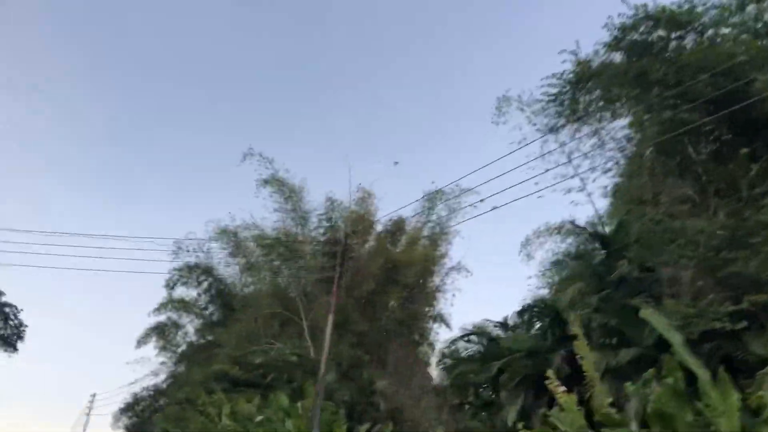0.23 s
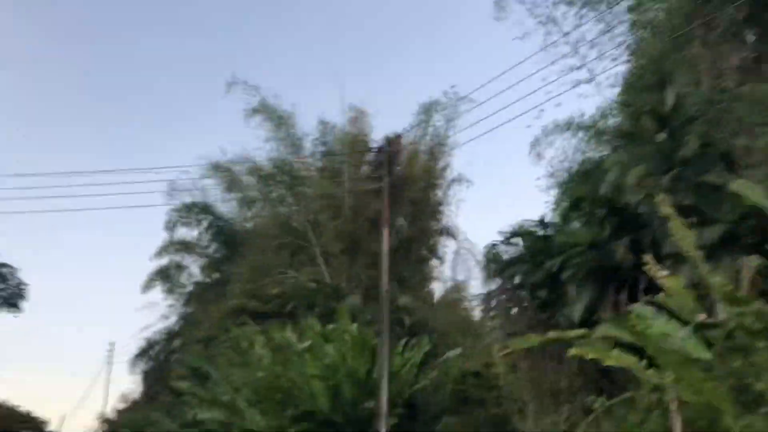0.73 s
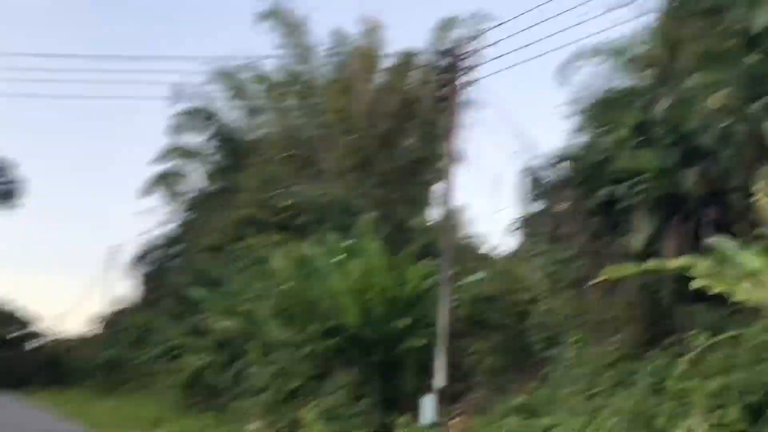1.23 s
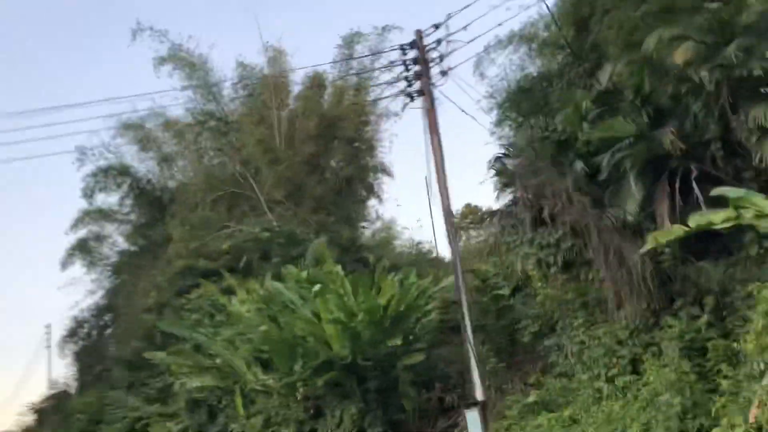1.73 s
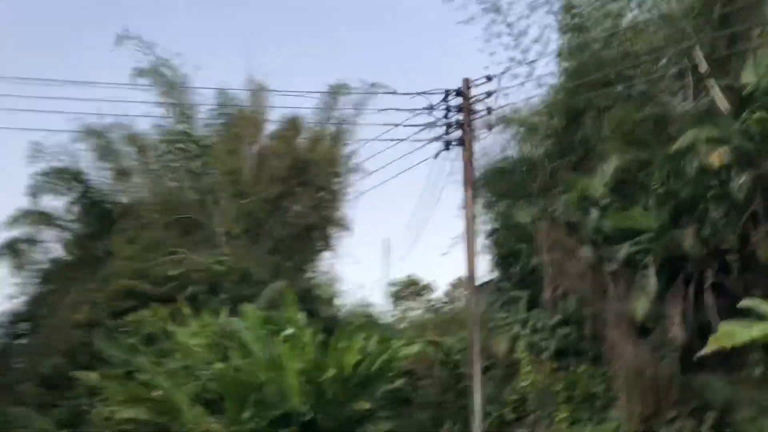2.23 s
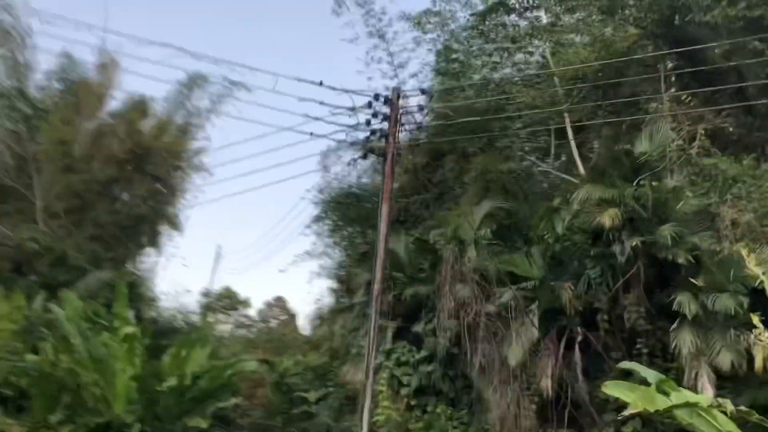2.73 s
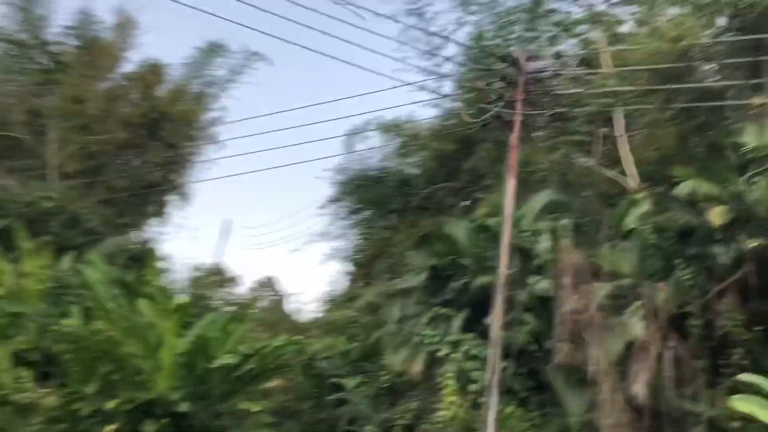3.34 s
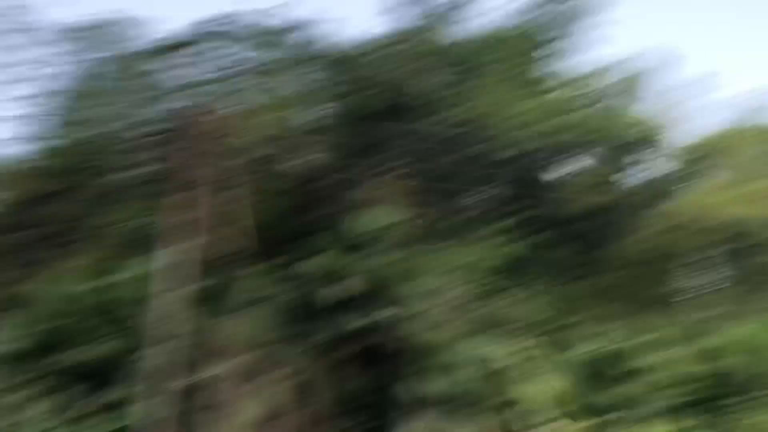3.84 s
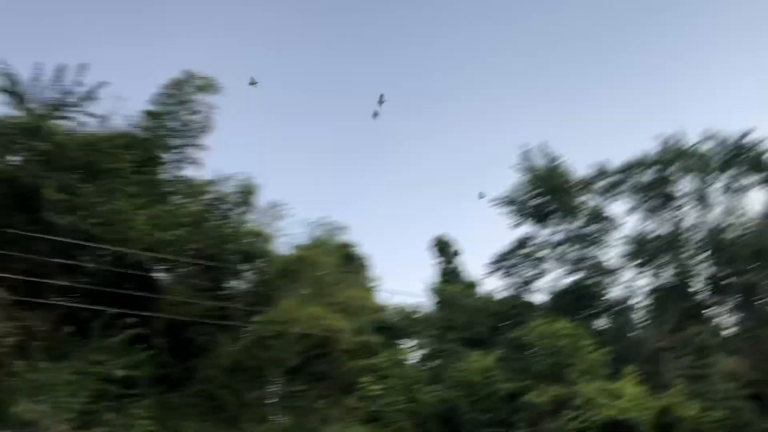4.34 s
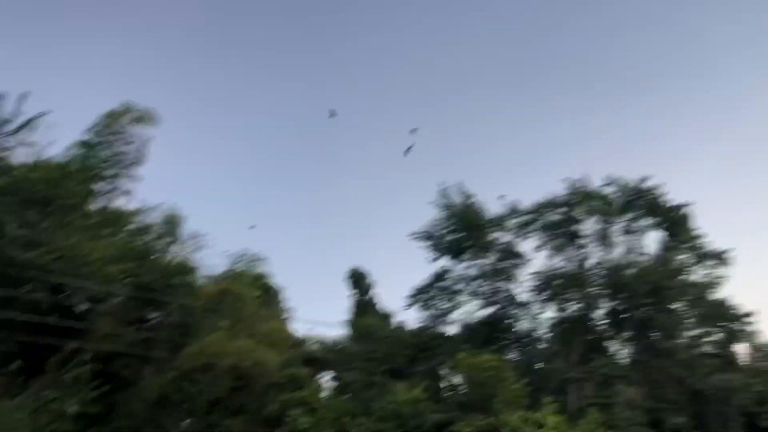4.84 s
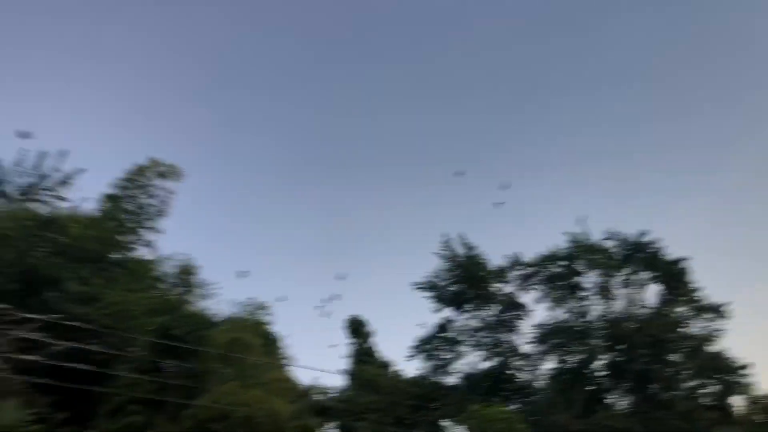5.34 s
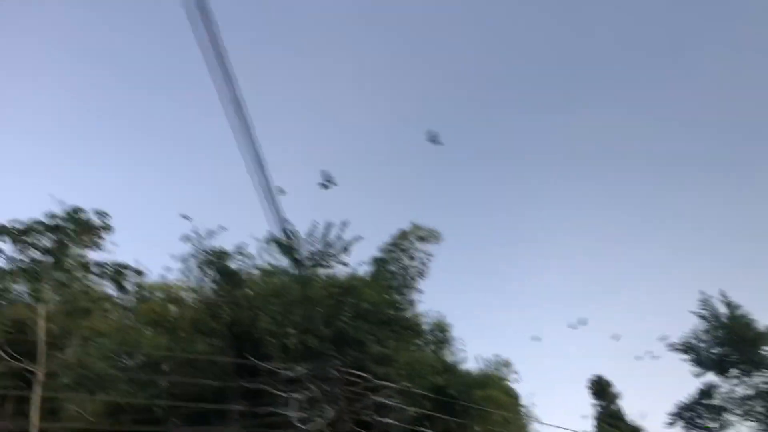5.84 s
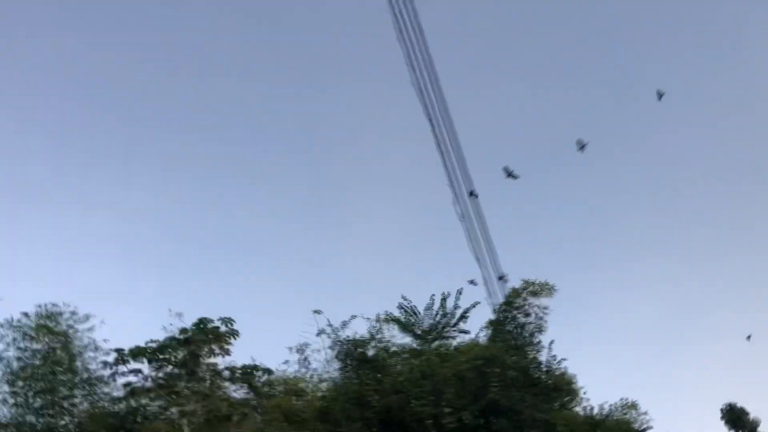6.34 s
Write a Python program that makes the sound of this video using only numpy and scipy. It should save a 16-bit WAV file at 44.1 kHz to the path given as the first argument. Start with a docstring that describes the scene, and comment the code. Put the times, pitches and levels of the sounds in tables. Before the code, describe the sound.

Parrots squawk along a forest road, their short, hoarse, falling calls mixed with nasal quacks, soft whistles and chips. Farther birds merge into a steady chatter among the trees. The calls are scattered at first, then come thicker and louder as the flock passes overhead. In the second half, puffs of wind buffet the microphone. A low outdoor rumble and a faint distant motor hum lie underneath.

```python
"""Parrots squawk over a forest road as their flock flies in and passes overhead.
A full call runs up in a nasal rasp, breaks with a yelp and falls as the syrinx relaxes; lone quacks,
whistles and chips come between. The farther birds merge into a chatter that the trees scatter.
A distant motor's hum and faint trills lie behind; from 4 s, puffs of wind buffet the microphone."""
import sys
import numpy as np
from scipy import signal
from scipy.fft import rfft, irfft, next_fast_len
from scipy.io import wavfile
from scipy.ndimage import uniform_filter1d

SR = 44100
rng = np.random.default_rng(int(sys.argv[2]) if len(sys.argv) > 2 else 0)


def file_out(sig):
    """Save sig as 16-bit WAV at sys.argv[1]."""
    # one column per channel
    cols = np.atleast_2d(sig).T
    # limit, then scale
    lim = np.clip(cols, -1, 1)
    pcm = np.round(lim * 32767).astype(np.int16)
    wavfile.write(sys.argv[1], SR, pcm)


N = 290619


def from_db(db):
    """Decibels to gain."""
    return 10 ** (np.asarray(db) / 20)


def unit_rms(x):
    """Scale to rms 1."""
    return x / np.sqrt(np.mean(x ** 2) + 1e-20)


def db_at(colour, hz):
    """Read a spectrum on a log-frequency axis."""
    points_hz, points_db = np.transpose(colour)
    return np.interp(np.log(hz + 1), np.log(points_hz), points_db)


def add(track, start_s, sound):
    """Mix a sound into a track."""
    start = int(np.clip(start_s * SR, 0, N - 1))
    track[start:start + len(sound)] += sound[:N - start]


def wander(size, per_s):
    """Smooth random motion of spread about 1."""
    place = np.arange(size) * per_s / SR
    knots = int(place[-1]) + 2
    return np.interp(place, np.arange(knots), rng.standard_normal(size)[:knots])


def noise(colour, size):
    """Noise with a given spectrum, rms 1."""
    padded = next_fast_len(size)
    gain = from_db(db_at(colour, np.fft.rfftfreq(padded, 1 / SR)))
    white = rfft(rng.standard_normal(size), padded)
    return unit_rms(irfft(white * gain)[:size])


def highpass(x, hz, order=2):
    """Butterworth low cut."""
    return signal.sosfilt(signal.butter(order, hz, "high", fs=SR, output="sos"), x)


def resonate(x, hz, width_hz):
    """Two-pole resonance, peak gain 1."""
    r = np.exp(-np.pi * width_hz / SR)
    feedback = [1, -2 * r * np.cos(2 * np.pi * hz / SR), r * r]
    return signal.lfilter(np.array([1, 0, -1]) * (1 - r * r) / 2, feedback, x)


def swell(size, rise_s, fall_s):
    """Rounded envelope."""
    t = np.arange(size) / SR
    ramp = np.minimum(t / rise_s, (t[-1] - t) / fall_s)
    return np.sin(np.pi / 2 * np.clip(ramp, 0, 1))


# Throat and beak ripple on the upper harmonics. Each row: frequency in Hz, gain in dB.
BEAK_RIPPLE = [(5600, -10.5), (6800, 7.5), (7900, -3.5), (8900, 2.5), (10500, -2), (12500, -1.5),
               (14000, 3), (15200, 0.5)]

def squawk(fall_s, start_hz, end_hz, bend, second_db, middle_db, top_db, jitter=0.016):
    """The syrinx starts tense and relaxes: a harmonic tone that falls fast, then levels off."""
    middle_hz, top_hz = 8760, 12800
    size = int(fall_s * 1.1 * SR)
    progress = np.arange(size) / (fall_s * SR)
    tension = (np.exp(-bend * progress) - np.exp(-bend)) / (1 - np.exp(-bend))
    tremor = jitter * wander(size, 1494) + 0.0092 * wander(size, 135)
    pitch_hz = (end_hz + (start_hz - end_hz) * tension) * (1 + tremor)
    phase = 2 * np.pi * np.cumsum(pitch_hz) / SR
    effort = swell(size, rise_s=fall_s / 7, fall_s=fall_s / 5)
    tone = np.zeros(size)
    for k in range(1, 9):
        hz = k * pitch_hz
        upper_db = db_at([(middle_hz, middle_db), (top_hz, top_db)], hz) + db_at(BEAK_RIPPLE, hz)
        level_db = 0 if k == 1 else second_db if k == 2 else upper_db
        leaf_fading = unit_rms(from_db(3.5 * wander(size, 181)))   # many paths through the leaves
        envelope = effort ** np.sqrt(k)   # high harmonics need full effort
        tone += from_db(level_db) * leaf_fading * envelope * np.sin(k * phase) * (hz < SR / 2)
    shimmer = from_db(2 * wander(size, 466))
    return np.sqrt(2) * tone * shimmer


# Throat and beak resonances. Each row: centre in Hz, width in Hz, gain in dB.
THROAT_MODES = [(1578, 174, -6), (2130, 354, 0.5), (3370, 730, -3.5), (4080, 510, -4), (5130, 250, -4),
                (7150, 300, -9.5), (8400, 3600, -28), (14500, 2800, -35.5)]

def rasp(length_s, throat_ratio=1, pulse_hz=800, chaos=0.13, hiss=0.58):
    """The forced syrinx beats chaotically and rings the throat, whose size differs from bird to bird."""
    size = int(length_s * SR)
    cycles = np.cumsum(pulse_hz * np.exp(chaos * wander(size, 900))) / SR
    pulses = unit_rms(np.diff(np.floor(cycles), prepend=0))
    source = pulses + hiss * rng.standard_normal(size)
    source *= from_db(-wander(size, 150))
    tuning = throat_ratio + 0.057 * rng.standard_normal(len(THROAT_MODES))
    voice = sum((-1) ** k * from_db(db) * resonate(source, hz * tuning[k], width_hz)
                for k, (hz, width_hz, db) in enumerate(THROAT_MODES))
    return unit_rms(voice) * swell(size, rise_s=0.008, fall_s=0.015)


# Throat shaping of a quack's harmonics. Each row: frequency in Hz, gain in dB.
QUACK_SPECTRUM = [(820, -11.5), (1650, -0.5), (2480, -11), (3300, 5), (4150, 4), (5000, -7), (5800, -12.5),
                  (6700, -10.5), (8000, -35), (9000, -12.5), (12000, -44)]

def quack(length_s, start_hz, end_hz, jitter=0.0093, fade_db=5):
    """A buzz whose second, fourth and fifth harmonics ring in the throat."""
    size = int(length_s * SR)
    pitch_hz = np.linspace(start_hz, end_hz, size) * (1 + jitter * wander(size, 647))
    phase = 2 * np.pi * np.cumsum(pitch_hz) / SR
    tone = np.zeros(size)
    for k in range(1, 15):
        level_db = db_at(QUACK_SPECTRUM, k * pitch_hz) + fade_db * wander(size, 120.5)
        tone += from_db(level_db) * np.sin(k * phase + 2 * np.pi * rng.random())
    return unit_rms(tone) * swell(size, rise_s=0.0037, fall_s=0.0068)


def low_voice(length_s, harshness, throat_ratio=1):
    """Between a clear quack (harshness 0) and a rasp (1); the quack's pitch differs from bird to bird."""
    pitch_ratio = np.exp(0.025 * rng.standard_normal())
    harsh = highpass(rasp(length_s, throat_ratio), hz=1300)
    clear = quack(length_s, start_hz=819.3 * pitch_ratio, end_hz=839.5 * pitch_ratio)
    return np.sqrt(harshness) * harsh + np.sqrt(1 - harshness) * clear


# Near squawks. Each row: start in seconds, fall time in seconds, start and end pitch in Hz, level in dB,
# then second harmonic, brightness and run-up in relative dB.
FULL_CALLS = [(0, 0.0386, 2280, 2064, -36.5, 1.5, 5, -18), (0.187, 0.039, 3500, 2130, -34, -2, -4.5, -9.5),
              (.288, 0.1, 2700, 2000, -42, -7, -35, -7), (0.684, 0.084, 2606, 2076, -36.5, -13, -2, -7.5),
              (.78, 0.035, 2720, 1963, -37.5, -7, -2, -6.5), (0.893, 0.1, 2370, 2170, -39.5, -6, -4, -7),
              (1.522, 0.1, 2740, 1910, -36.5, -8, -0.5, -5), (2.418, 0.068, 2870, 2065, -42.5, -12, -4, -7),
              (2.741, 0.068, 2747, 1910, -35.5, -1, 5, -1),
              (2.999, 0.035, 2500, 2070, -32.5, -5.5, 1, -4.5), (3.092, .05, 2664, 2060, -39.5, -3, -2, 2),
              (3.257, 0.047, 2675, 2010, -31, -8.5, -2, -9.5),
              (3.349, 0.054, 2824, 1935, -32.5, -4.5, -3, 0),
              (3.545, 0.059, 2970, 2050, -31.5, -2.5, 3.5, -1.5),
              (3.726, 0.054, 2910, 2110, -41.5, 2, 9, 4.5), (3.775, 0.054, 2610, 1930, -36, -11, 0, 1.5),
              (3.806, 0.055, 3150, 2010, -34, -1.5, 3, -10),
              (3.934, 0.051, 2690, 2100, -36.5, -8, 8.5, 0.5), (4.049, 0.061, 2680, 2023, -33.5, -5, 0, 0),
              (4.08, 0.044, 2770, 1970, -33.5, -1, 5.5, -15), (4.233, 0.053, 2550, 1970, -36.5, -1, 8, 1.5),
              (4.367, 0.064, 2846, 1922, -29, -7, -3, -6.5), (4.615, .055, 2425, 2000, -32, -10, 2, -8),
              (4.666, 0.065, 2543, 2103, -28.5, -8, 2, -3.5),
              (4.727, 0.052, 2530, 2110, -32.5, -16, 2, -13), (4.869, .052, 2460, 2076, -26.5, -9, 0, -5),
              (4.941, 0.055, 2840, 2020, -27, -9, 7, -1.5),
              (5.248, 0.057, 2890, 1970, -27.5, -7.5, 4.5, -5), (5.315, .05, 2446, 1962, -28, -18, -9, -4),
              (5.355, 0.035, 2710, 2110, -33, -14, -6, -13), (5.416, 0.031, 2334, 2056, -29.5, -3, 1, -4),
              (5.582, 0.069, 2793, 1895, -27.5, -7, 6, -1), (5.609, 0.078, 3040, 2030, -30.5, -23, 1, -13),
              (5.774, 0.056, 2620, 2033, -32, -7, 4, -3.5),
              (5.867, 0.089, 2890, 1922, -25.5, -7.5, -0.5, -1),
              (5.895, 0.05, 2347, 1896, -28, -9, 6.5, -11), (5.977, 0.052, 2250, 2060, -34, -18, -6, -15),
              (6.135, 0.05, 2723, 2010, -27, -9, -3, -5), (6.198, 0.056, 2583, 1990, -31.5, -14, 4, -4),
              (6.321, 0.068, 2635, 1875, -29, -4, 8, 1), (6.344, 0.038, 2323, 2080, -28.5, -7, 4, -1),
              (6.405, 0.058, 3050, 2023, -25.5, -10, -8, -6)]

def full_calls(run_up_s=0.066, overlap_s=0.006, yelp_lead_s=0.014, hoarse_db=-19):
    """A near bird runs up in the low voice, breaks with a yelp and falls in a hoarse squawk."""
    out = np.zeros(N)
    for start_s, fall_s, start_hz, end_hz, db, second_db, bright_db, run_up_db in FULL_CALLS:
        if start_s > run_up_s:
            run_up = low_voice(run_up_s, harshness=0.54, throat_ratio=1.068)
            add(out, start_s + overlap_s - run_up_s, from_db(db + run_up_db) * run_up)
            yelp = squawk(0.0213, 1.2 * start_hz, start_hz, bend=0.3,
                          second_db=-8.5, middle_db=-15, top_db=-32, jitter=0.068)
            add(out, start_s - yelp_lead_s, from_db(db + run_up_db - 3.5) * yelp)
        bend = 5.2 * np.log2(start_hz / end_hz)   # a wider fall levels off sooner
        middle_db = -18.5 + 0.6 * bright_db
        top_db = -29.5 + 1.55 * bright_db + 0.5 * (db + 36)   # louder, nearer birds keep more top
        fall = squawk(fall_s, start_hz, end_hz, bend, second_db, middle_db, top_db)
        add(out, start_s, from_db(db) * fall)
        add(out, start_s, from_db(db + hoarse_db) * low_voice(fall_s, harshness=1))
    return out


# Each row: start in seconds, length in seconds, relative level in dB, harshness 0-1, throat tuning ratio.
LONE_CALLS = [(0, 0.049, -39.5, 0.76, 1.06), (0.428, 0.1, -40, 1, 0.76), (.82, 0.049, -42, 0.9, 1),
              (0.981, 0.056, -45, 0.8, 1.05), (1.281, 0.12, -42.5, 0.86, 0.9), (1.33, 0.048, -41, .9, 1.09),
              (2.522, 0.086, -39, 0.76, 0.95), (2.8, 0.063, -38, 0.6, 0.96),
              (2.919, 0.045, -40.5, 0.8, 0.86), (3.167, 0.078, -41, 0.05, 1), (3.46, 0.068, -39, 0.14, 1.1),
              (3.635, .04, -38, 0.3, 1.3), (3.704, 0.12, -38, 0.8, 1.2), (4.489, 0.062, -28.5, 0.84, 0.96),
              (5.1, 0.13, -31.5, 0.75, 1.05), (5.487, 0.044, -33.5, 0.5, 1),
              (6.232, 0.053, -29.5, 0.7, 1.13), (6.539, 0.081, -35, 0.3, 0.72)]

def lone_calls(gain_db=1):
    """Near birds quack and rasp in the low voice alone."""
    out = np.zeros(N)
    for start_s, length_s, db, harshness, throat_ratio in LONE_CALLS:
        add(out, start_s, from_db(db + gain_db) * low_voice(length_s, harshness, throat_ratio))
    return out


def tree_echoes(x, t60_s=0.14, first_s=0.012, dull_hz=5000):
    """Trunks and foliage return a thin, dull spray of echoes."""
    t = np.arange(SR // 2) / SR
    echoes = rng.standard_normal(len(t)) * (rng.random(len(t)) < 0.02)
    echoes *= from_db(-60 * t / t60_s) * (t > first_s)
    echoes = signal.sosfilt(signal.butter(1, dull_hz, fs=SR, output="sos"), echoes)
    return signal.fftconvolve(x, echoes / np.sqrt(np.sum(echoes ** 2)))[:N]


def far_calls(count=120, spread_db=6):
    """Many birds quack, rasp and squawk at random among the trees; the sum is held at a steady level."""
    calls = np.zeros(N)
    times_s = (np.arange(count) + rng.random(count)) * N / SR / count
    for time_s, stretch, pitch, loudness in zip(times_s, *rng.standard_normal((3, count))):
        length_s = 0.048 * np.exp(0.2 * stretch)
        pitch_ratio = np.exp(0.055 * pitch)
        gain = from_db(spread_db * loudness)
        opening = quack(length_s, 810 * pitch_ratio, 850 * pitch_ratio)
        add(calls, time_s - 2 * length_s, gain * from_db(-6) * opening)
        add(calls, time_s - length_s, gain * rasp(length_s))
        fall = squawk(length_s, 2800 * pitch_ratio, 2020 * pitch_ratio, bend=2.3,
                      second_db=-6.5, middle_db=-29.5, top_db=-34)
        add(calls, time_s, gain * from_db(-1.5) * fall)
    calls = highpass(calls, hz=1400)
    calls += from_db(-3.5) * tree_echoes(calls)
    return calls / np.sqrt(uniform_filter1d(calls ** 2, size=SR // 8) + 1e-9)


# The flock's approach. Each row: time in seconds, chatter and treble levels in relative dB.
APPROACH = [(0.0, -38, -51), (0.44, -43, -76), (0.84, -37, -56), (1.06, -44.5, -62), (1.38, -41.5, -65),
            (1.76, -45, -64.5), (2.29, -45, -56), (2.88, -36.5, -53.5), (3.3, -37.5, -54), (3.89, -30, -49),
            (4.33, -27.5, -44), (4.59, -25.5, -40.5), (5.19, -26.5, -46.5), (6.31, -25, -43),
            (6.42, -27.5, -40.5), (6.59, -28.5, -48)]
# Merged echoes and their treble. Each row: frequency in Hz, relative density in dB.
WASH_SPECTRUM = [(500, -21.5), (800, -13.5), (1150, -13), (1450, -11), (1650, -10), (1800, -7.5),
                 (2100, -0.5), (2400, -9.5), (2850, -13.5), (3300, -7.5), (3700, -8.5), (4250, -7),
                 (5600, -18.5), (6700, -16), (8000, -33), (9000, -25.5), (12000, -56)]
TREBLE_SPECTRUM = [(6000, -15), (7700, -4), (8900, 1.5), (10500, 0), (12500, -2), (15000, -3.5)]

def far_flock():
    """Far calls and their echoes merge into a wash that grows as the flock nears."""
    times_s, *levels_db = np.transpose(APPROACH)
    chatter_db, treble_db = (np.interp(np.arange(N) / SR, times_s, db) for db in levels_db)
    calls = from_db(-4) * far_calls()
    wash = noise(WASH_SPECTRUM, N) * from_db(-6 + 2 * wander(N, 45))
    treble = from_db(treble_db - 3.8 + 4.1 * wander(N, 25)) * noise(TREBLE_SPECTRUM, N)
    return from_db(chatter_db) * (calls + wash) + treble


def motor_hum(hz=156.3, level_db=-60, waver_hz=4.1, waver_db=3.5):
    """A distant motor: one tone, wavering in pitch and level."""
    phase = 2 * np.pi * np.cumsum(hz + waver_hz * wander(N, 1.52)) / SR
    return from_db(level_db + waver_db * wander(N, 8.3)) * np.sqrt(2) * np.sin(phase)


# Outdoor background. Each row: frequency in Hz, relative density in dB.
RUMBLE_SPECTRUM = [(15, -51), (25, -26), (53, -5), (85, -10), (108, -2.5), (128, -5.5), (159, 2), (329, -8),
                   (370, -7.5), (645, -12.5), (690, -11), (790, -11.5), (1180, -12.5), (1400, -8.5),
                   (1820, -12.5), (3080, -120)]

def outdoor_rumble(level_db=-46.5):
    """Steady low noise of the open air."""
    return from_db(level_db) * noise(RUMBLE_SPECTRUM, N)


# Each row: start in seconds, fall time in seconds, pitch in Hz, level in dB.
WHISTLE_NOTES = [(.005, 0.067, 2257, -40.5), (.545, .05, 2180, -41), (1.024, 0.152, 2090, -44.5),
                 (1.204, .125, 2100, -39), (1.334, 0.044, 2120, -41), (2.017, 0.047, 2100, -50),
                 (2.061, 0.032, 1485, -51), (2.096, 0.047, 2190, -49), (2.199, 0.058, 2130, -48)]

def whistles(sag=0.0199):
    """Soft notes from the syrinx that sag slightly in pitch."""
    out = np.zeros(N)
    for start_s, fall_s, hz, db in WHISTLE_NOTES:
        note = squawk(fall_s, hz * (1 + sag), hz * (1 - sag), bend=0.82,
                      second_db=-9.5, middle_db=-42, top_db=-40)
        add(out, start_s, from_db(db) * note)
    return out


# Each row: start in seconds, length in seconds, pitch in Hz, chirps per second, level in dB,
# pitch waver as a fraction.
TRILL_BURSTS = [(0.75, 0.25, 5560, 45, -64, .009), (1.78, 0.24, 6060, 34.6, -65.5, 0.01),
                (2.09, 0.21, 5540, 40, -60, 0.01), (1.55, .68, 11500, 27, -68, .07)]

def trills():
    """Thin, unsteady tones chopped into quick chirps, as of insects."""
    out = np.zeros(N)
    for start_s, length_s, hz, chirps_per_s, db, waver in TRILL_BURSTS:
        size = int(length_s * SR)
        phase = 2 * np.pi * np.cumsum(hz * (1 + waver * wander(size, 1500))) / SR
        gate = np.sin(np.pi * chirps_per_s * np.arange(size) / SR) ** 4
        chirps = unit_rms(gate * np.sin(phase))
        add(out, start_s, from_db(db) * chirps * swell(size, rise_s=0.038, fall_s=0.026))
    return out


# Each row: start in seconds, fall time in seconds, start pitch in Hz, level in dB.
CHIP_NOTES = [(1.629, .032, 4950, -44.5), (1.856, 0.036, 4600, -52), (2.306, 0.036, 4530, -48),
              (3.938, .011, 3570, -38), (4.486, .014, 3510, -35), (5.186, .015, 3580, -33.5),
              (5.53, 0.014, 3600, -33), (5.57, 0.017, 3520, -30.5), (5.831, .011, 3660, -30),
              (5.988, .012, 3640, -37), (6.571, 0.012, 3600, -35)]

def chips(fall_per_s=9, dulling_db_per_s=550):
    """Brief, steeply falling notes; the longer the chip, the purer its tone."""
    out = np.zeros(N)
    for start_s, fall_s, hz, db in CHIP_NOTES:
        dull_db = dulling_db_per_s * fall_s
        note = squawk(fall_s, hz, hz * np.exp(-fall_per_s * fall_s), bend=0.7,
                      second_db=-dull_db, middle_db=-dull_db, top_db=-11 - dull_db, jitter=0.052)
        add(out, start_s, from_db(db) * note)
    return out


# Puffs, and sharp eddies in the first puff. Each row: start in seconds, length in seconds, level in dB.
PUFFS = [(4.062, .47, -33.5), (4.675, 0.095, -36.5), (4.79, .12, -37.5), (5.524, 0.059, -42),
         (5.64, .1, -49), (5.777, 0.19, -42.5), (6.373, 0.22, -36)]
EDDIES = [(4.183, 0.023, -33), (4.265, 0.056, -33.5), (4.319, 0.016, -21), (4.346, 0.011, -22.5),
          (4.4, 0.011, -28)]
# Their spectra. Each row: frequency in Hz, relative density in dB.
PUFF_SPECTRUM = [(25, -23), (55, 2.5), (95, -2.5), (140, 2), (250, -3), (450, -14), (900, -30.5),
                 (1600, -72)]
EDDY_SPECTRUM = [(80, -30), (200, 2), (340, 2.5), (650, -5), (1100, -20), (2000, -44)]

def wind(breeze_start_s=4, breeze_rise_s=1.5, breeze_db=-46, lump_db=2.2):
    """Turbulence at the microphone port: puffs on a light breeze; the strongest eddies sound higher."""
    puffs = np.zeros(N)
    for start_s, length_s, db in PUFFS:
        envelope = swell(int(length_s * SR), rise_s=0.3 * length_s, fall_s=0.54 * length_s)
        add(puffs, start_s, from_db(db) * envelope)
    breeze = from_db(breeze_db) * np.clip((np.arange(N) / SR - breeze_start_s) / breeze_rise_s, 0, 1)
    lumps = from_db(lump_db * wander(N, 50))
    out = np.hypot(puffs, breeze) * lumps * noise(PUFF_SPECTRUM, N)
    for start_s, length_s, db in EDDIES:
        size = int(length_s * SR)
        eddy = noise(EDDY_SPECTRUM, SR // 10)[:size]
        add(out, start_s, from_db(db) * eddy * swell(size, rise_s=0.0027, fall_s=0.005))
    return out


def scene():
    """Birds and their echoes over the outdoor background, in mono."""
    near = full_calls() + lone_calls() + whistles() + chips()
    birds = near + from_db(-15.5) * tree_echoes(near) + far_flock()
    return (birds + trills() + motor_hum() + outdoor_rumble() + wind())[None]


def record(dry, low_cut_hz=40, high_cut_hz=15900):
    """The microphone drops the deepest bass; the top is cut steeply."""
    thinned = highpass(dry, low_cut_hz, order=4)
    return signal.sosfilt(signal.ellip(10, 0.1, 80, high_cut_hz, fs=SR, output="sos"), thinned)


dry = scene()
out = record(dry)
file_out(out)
```